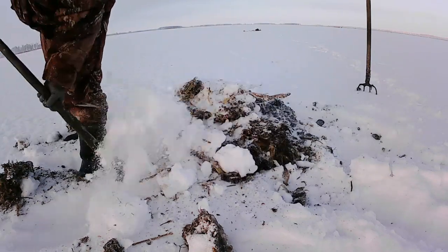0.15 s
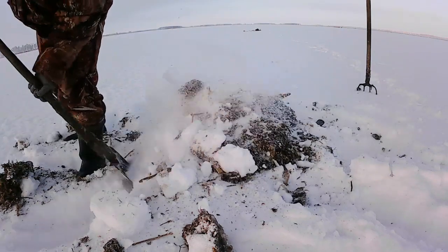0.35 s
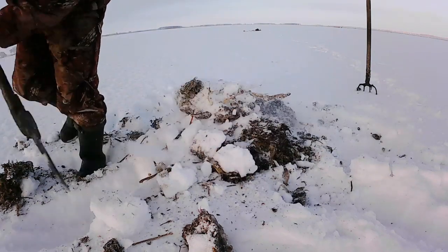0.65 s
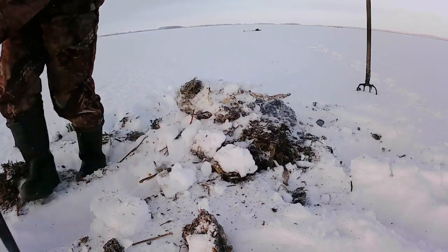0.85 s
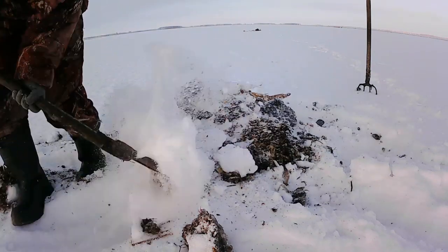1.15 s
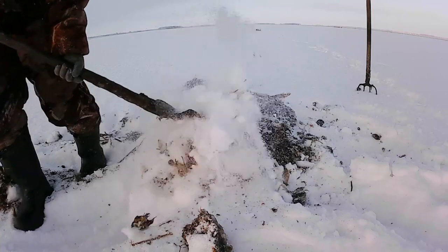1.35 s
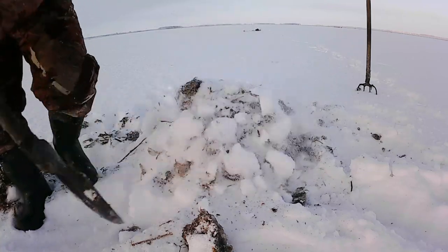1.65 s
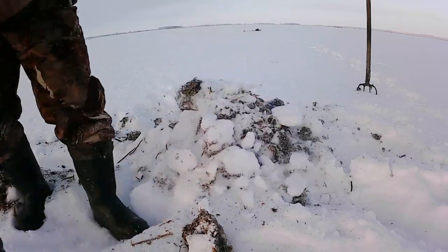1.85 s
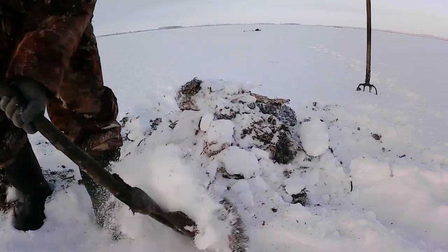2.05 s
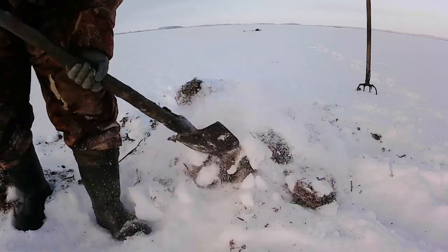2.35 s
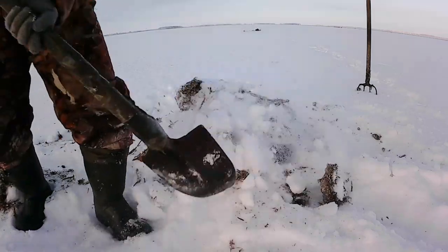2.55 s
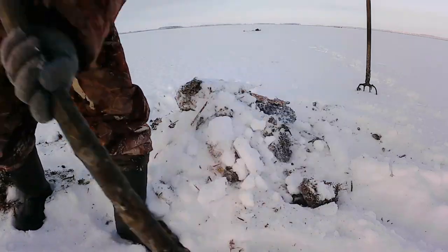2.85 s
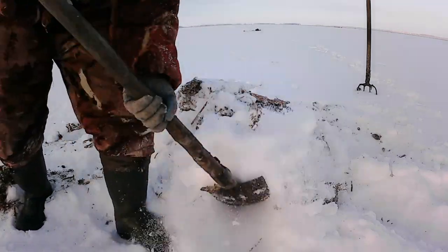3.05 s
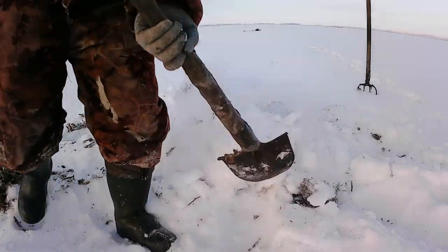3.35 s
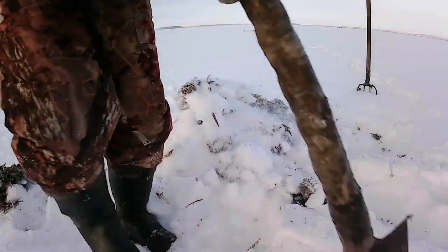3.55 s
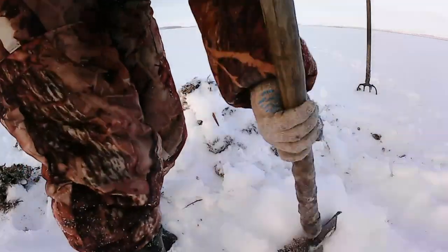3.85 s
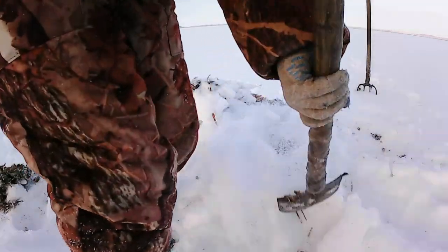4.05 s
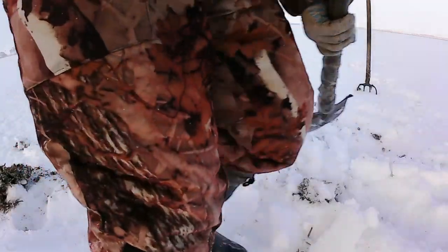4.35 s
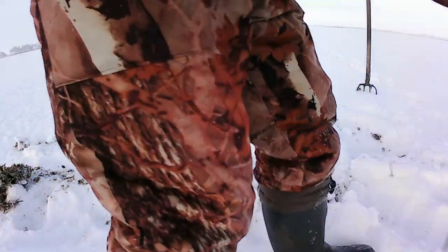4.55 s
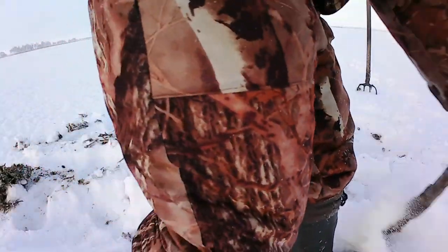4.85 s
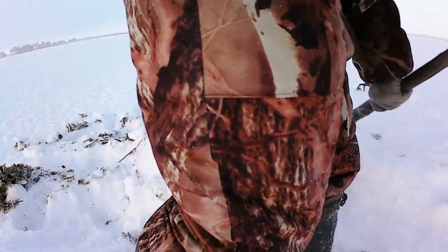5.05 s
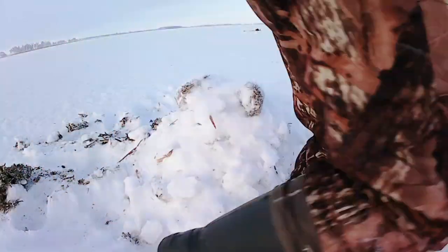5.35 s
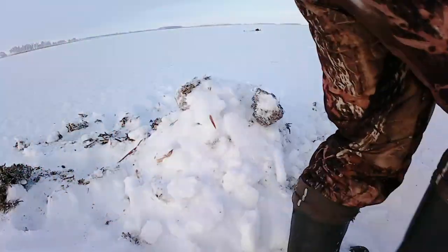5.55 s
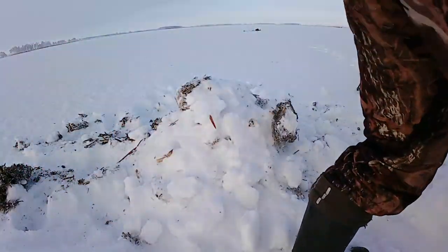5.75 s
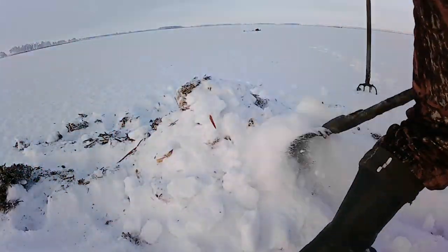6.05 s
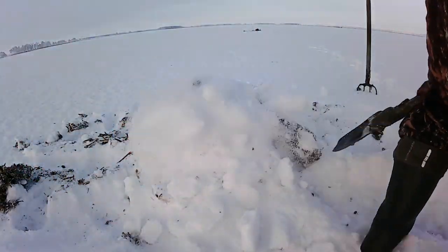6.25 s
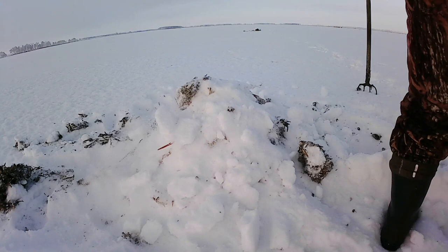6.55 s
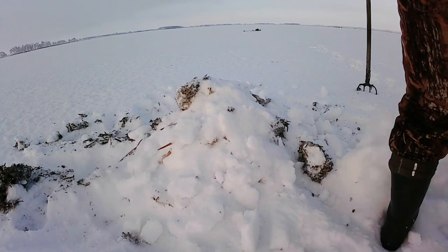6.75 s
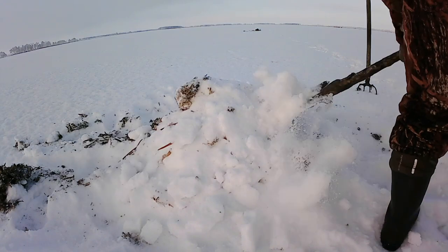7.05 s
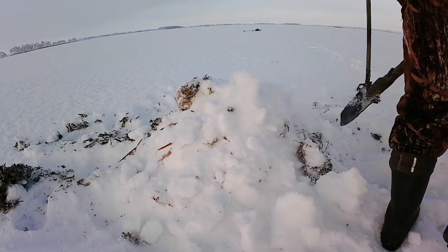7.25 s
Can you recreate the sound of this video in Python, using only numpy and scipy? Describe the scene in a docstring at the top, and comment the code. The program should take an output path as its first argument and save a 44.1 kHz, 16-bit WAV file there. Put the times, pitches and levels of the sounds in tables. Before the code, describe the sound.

A crisp crunch opens, dips almost to silence, then a spade bites and drags through packed snow. Two denser bursts of scraping and breaking crust follow, then a sharp, loud chop with a low thud. Afterwards boots squeak and crunch nearby, clothing brushes softly, and smaller throws patter and scrape. Dry, close outdoor mono sound with no echo and very faint hiss.

```python
"""Shovelling dry snow

A spade cuts, scrapes and throws dry snow onto a heap in an open field while boots tread close to a small mono microphone.
Breaking snow is a sum of countless tiny cracks, filtered into four bands: packed snow thuds, crust crunches,
grit scrapes the blade and powder hisses. Lumps give way as short bursts with a sharp snap, crumbs crack as short
pitched grains, and boots and clods thump as damped low cycles. Knocks and grit excite decaying modes of the
steel blade; trouser legs brush as cracks in one moving band, over a faint filtered-noise hiss."""
import sys
import numpy as np
from scipy import signal
from scipy.io import wavfile
from scipy.ndimage import uniform_filter1d

SR = 44100
rng = np.random.default_rng(int(sys.argv[2]) if len(sys.argv) > 2 else 0)


def unload_audio(sound):
    """Save the sound as a 16-bit wav file, at the path given as the first command line argument."""
    columns = np.transpose(np.atleast_2d(sound))
    # keep every value between -1 and 1, then stretch to whole-number steps
    steps = np.round(np.clip(columns, -1, 1) * 32767)
    wavfile.write(sys.argv[1], SR, steps.astype(np.int16))


N = 326781  # length in samples

# Cuts, scrapes, throws and steps that crush snow: start_s, rise_s, hold_s, crunch_db (once risen),
# slope_db_per_s (during the hold), then relative to the crunch: weight_db, grit_db, powder_db; last hollow_hz
STROKE_EVENTS = [(0, 0.001, 0.2, -25, -19, -10.5, -7, -13, 1380),
                 (0.2, 0.039, 0.21, -40, 26, -6, -12, -16, 1400),
                 (0.451, 0.011, 0.082, -50.5, -45.5, -7, -8, -6, 900),
                 (0.58, 0.018, 0.13, -51, -40, -19, -19, -9, 1300),
                 (0.877, 0.0044, 0.052, -48, 283, -5, -16, -1.5, 1390),
                 (0.9, 0.086, 0.049, -22, 0, -10, -7, -12.5, 1010),
                 (1.03, 0.019, 0.67, -27.5, -7, -8.5, -6.5, -15.5, 1370),
                 (1.529, 0.01, 0.28, -41.5, -16, -11, -2.5, -9, 1490),
                 (1.779, 0.011, 0.066, -32.5, -67, -4.5, -9, -9, 1250),
                 (1.855, 0.015, 0.1, -32, 26, -6, -4.5, -13.5, 1260),
                 (1.95, 0.029, 0.094, -23, -12, -10, -3.5, -7, 1280),
                 (2.07, 0.035, 0.049, -18.5, -109, -8.5, 1.5, -11, 1380),
                 (2.15, 0.026, 0.1, -22.5, -56, -17, -3, -14, 1540),
                 (2.27, 0.023, 0.21, -33.5, -36, -7.5, -1.5, -11, 1370),
                 (2.49, 0.034, 0.092, -31, -100, -10.5, -7.5, -22, 1360),
                 (2.59, 0.053, 0.27, -32, -27, -3.5, -6.5, -15.5, 1220),
                 (2.863, 0.03, 0.11, -20, -30, -15, -1, -9, 1440),
                 (2.97, 0.029, 0.13, -26, -9, -13, 0.5, -13, 1440),
                 (3.09, 0.048, 0.24, -31, -3, -11.5, -3, -15.5, 1350),
                 (3.38, 0.038, 0.23, -50, 62, -6.5, -1.5, -11, 1300),
                 (3.659, 0.034, 0.029, -22.5, -114, -15, -12, -23.5, 900),
                 (3.725, 0.014, 0.053, -14.5, -117, -10.5, -2, -7.5, 1340),
                 (3.792, 0.021, 0.13, -22, -54, -9.5, -1, -13, 1250),
                 (3.938, 0.11, 0.16, -26, -29, -6.5, -4, -19, 1120),
                 (4.223, 0.0067, 0.037, -31, 25, -5, -10, -26, 1190),
                 (4.27, 0.037, 0.037, -49.5, -57, -1, 2, -9, 1450),
                 (4.329, 0.0064, 0.013, -32.5, 100, -3.5, -12, -33, 930),
                 (4.36, 0.01, 0.056, -57, -50, -8, -7, -18, 900),
                 (4.455, 0.0057, 0.089, -47.5, -67, -13, -3, -26, 1230),
                 (4.529, 0.024, 0.22, -33.5, 3, -7, -7, -18, 1340),
                 (4.775, 0.054, 0.15, -31, -14, -13.5, 1.5, -13.5, 1460),
                 (4.99, 0.013, 0.21, -36.5, 13, -7, -7, -23, 1550),
                 (5.23, 0.0078, 0.073, -33.5, -22, -7.5, -6, -35, 1380),
                 (5.339, 0.011, 0.061, -41.5, 75, -14, -10, -16, 1090),
                 (5.504, 0.008, 0.041, -34, -438, -7, -11, -27, 1116),
                 (5.594, 0.0079, 0.099, -37.5, 93, -13, -6.5, -16, 1290),
                 (5.68, 0.05, 0.11, -30.5, -35, -6.5, -4, -23, 1430),
                 (5.81, 0.042, 0.18, -38, 1, -3.5, -6, -18, 1450),
                 (6.04, 0.0093, 0.035, -31.5, -56, -9.5, -5, -29, 1580),
                 (6.09, 0.051, 0.112, -43, -109, -24, 1, -7, 1490),
                 (6.22, 0.034, 0.14, -53.5, 15, -10, 2, 0, 1500),
                 (6.355, 0.029, 0.22, -36, -18, -6.5, -5, -11.5, 1300),
                 (6.549, 0.0056, 0.048, -31, -93, -10, -6, -9, 1600),
                 (6.599, 0.016, 0.13, -35, -26, -7.5, 1.5, -8.5, 1600),
                 (6.73, 0.05, 0.18, -35, 20, -9, -5.5, -19, 1440),
                 (6.96, 0.034, 0.21, -38.5, -5, -10.5, -3.5, -15, 1500),
                 (7.15, 0.029, 0.39, -47, 10, -32, -4, -13.5, 1590)]
# Change of each grain kind within a stroke: weight_db_per_s, crunch_db_per_s, grit_db_per_s, powder_db_per_s
SETTLING_SLOPES = (-8.5, 0, -6, -19.5)
# Loose snow trickling between strokes: weight_db, crunch_db, grit_db, powder_db
TRICKLE_LEVELS = (-57.5, -54, -58.5, -63)
# Relative colour of breaking snow as the microphone housing shapes it: frequency_hz, level_db
SNOW_COLOUR = [(18, -100), (30, -19), (244, -8), (760, -1.5), (863, 0.5), (1110, -3), (1500, 2),
               (2430, -5.5), (2690, -5), (2970, -9.5), (4030, -9), (4680, -13.5), (7190, -19), (12500, -36),
               (16300, -103), (22000, -120)]
# Grain kinds, one row each for weight, crunch, grit, powder: low_edge_hz, high_edge_hz, cracks_per_s, size_spread_db, gain_db
GRAIN_KINDS = [(106, 590, 900, 2.5, -1), (564, 1830, 3500, 2, -5.5), (2390, 5140, 4000, 0, -3),
               (4970, 31000, 16000, 2.5, -1.5)]
# Lumps that give way: start_s, level_db (before a trim for each grain kind), grit_db and ring_db (relative
# to the lump, before trims), struck_spot_hz
LUMP_EVENTS = [(0.043, -4, -6.5, -29, 1760), (0.092, -15, -11, -10, 1570), (0.13, -15.5, -6, 0.5, 1584),
               (0.173, -13.5, -11, -11, 1400), (0.431, -14.5, -9.5, -18, 830),
               (0.609, -23.5, -28, -23, 1550), (0.634, -30, -18, -11, 596), (0.903, -18, -21, -6, 1350),
               (0.943, -21, -17, -18, 1380), (0.996, -5.5, -4, -0.5, 2940), (1.026, -7.5, -30, -4.5, 930),
               (1.148, -12.5, -3.5, -4, 1740), (1.195, -11, -4.5, -26, 1400), (1.267, -19, 0.5, -3, 1680),
               (1.515, -28, -7, -15, 1620), (1.79, -19.5, -11, -15, 1240), (1.982, -2, -6, -7, 2770),
               (2.004, -10, -10, -3.5, 864), (2.029, -4.5, -1, -5, 3360), (2.099, 1, -13, -9, 3370),
               (2.122, -4, -4, -19, 2540), (2.134, -6, -1, -7, 1740), (2.182, -2.5, -5.5, -20, 1640),
               (2.211, -4, -8.5, -9.5, 1730), (2.265, -5.5, -10, -10, 3720), (2.366, -10, -19, -29, 1480),
               (2.505, -11, -34.5, -26, 1340), (2.875, -18, 4, 0, 4220), (2.894, -7, 1.5, -13, 1540),
               (2.916, 0.5, -0.5, -8, 1760), (2.987, -11, 0, -1, 920), (3.01, -7, -9, -7, 1230),
               (3.058, -13.5, -10, 4, 1550), (3.073, -6, -4, -8.5, 1570), (3.187, -11, -11, -9.5, 1570),
               (3.327, -8, -6.5, -24, 1760), (3.625, -21, -26, -12, 1205), (3.69, -22, -26, -3, 860),
               (3.739, 6.5, -8, -7, 4230), (3.744, 2.5, -23, -5.5, 1360), (3.77, 1.5, -4, -7.5, 2260),
               (3.787, -3, -3.5, -19, 2250), (3.844, 0, -8.5, -11, 2250), (3.924, -11, -24, -2, 1940),
               (4.025, -16, -25, 3.5, 1740), (4.098, -16, -25, 1.5, 870), (4.181, -5.5, -16, -5, 990),
               (4.231, -18, -22, -4, 880), (4.25, -11, -14, -9, 1440), (4.336, -16.5, -26, -19, 840),
               (4.556, -22, -3, -1, 1400), (4.807, -20.5, -2, 0, 1570), (4.867, -10.5, -0.5, -4, 1010),
               (4.925, -16.5, -3.5, 3, 1730), (4.998, -14.5, -9, -9, 1654), (5.078, -14.5, -14, -9, 1760),
               (5.2, -14.5, -18, -7.5, 1480), (5.235, -25, -10, -7, 1690), (5.391, -26, -26, -4.5, 860),
               (5.51, -31, -35, -16, 1150), (5.649, -15, -4, -20, 646), (5.797, -23.5, 2, -17, 3800),
               (6.051, -19, -1.5, -8, 3700), (6.07, -19, -4.5, -13.5, 1570), (6.266, -28.5, -7, -12, 1890),
               (6.3, -19.5, -34, -25, 1490), (6.385, -31, -4, 5, 760), (6.554, -23.5, 2.5, -3.5, 1730),
               (6.621, -20.5, 3.5, 0, 1580), (6.712, -15, -17, -11.5, 1600),
               (6.961, -37, -20.5, -18.5, 825), (7.335, -30, -2, -6, 1710)]
# A boot, a clod or the blade lands on packed snow: start_s, level_db (before the trims of packing and thud)
THUMP_EVENTS = [(0.43, -24.5), (0.943, -37), (1.149, -25), (1.515, -35), (1.79, -22.5), (1.978, -21),
                (2.21, -29), (2.369, -32), (2.505, -29), (3.328, -23.5), (3.693, -20.5), (3.744, -29),
                (3.772, -17), (4.1, -24), (4.232, -27), (4.25, -18), (4.337, -30.5), (4.554, -28),
                (5.2, -25), (5.238, -40), (5.521, -35), (5.601, -37), (5.649, -28.5), (5.75, -26),
                (6.072, -38), (6.268, -42), (6.712, -33), (6.96, -28.5), (7.334, -37)]
# Modes of the steel blade: mode_hz, level_db, t60_s
BLADE_MODES = [(591, -5, 0.13), (870, -1, 0.2), (1015, -9.5, 0.031), (1334, -1, 0.058), (1566, -0.5, 0.049),
               (1732, -2.5, 0.1), (2097, -7.5, 0.17), (2254, -2.5, 0.029), (2665, -8, 0.043),
               (2802, -9.5, 0.076), (3388, -3.5, 0.079), (3820, 1, 0.022), (4160, -5, 0.073),
               (5500, -27, 0.12)]
# Stiff trouser legs brushing together near the microphone: start_s, level_db, fade_s
BRUSH_EVENTS = [(4.768, -36.5, 0.25), (5.026, -39.5, 0.1), (5.603, -45, 0.27), (6.51, -51, 0.78)]
# Relative colour of the field and microphone hiss: frequency_hz, level_db
AIR_COLOUR = [(18, -12), (30, -9.5), (384, -7.5), (470, -5.5), (653, -16.5), (1360, -14), (2250, -66),
              (10200, -17.5), (12500, -20.5), (16300, -23), (22000, -120)]

RISE_CURVE, STOP_S = 1.14, 0.014  # exponent of the swell into a stroke; time constant of its stop
TRICKLE_HZ = 1340  # pitch of the hollow between strokes
HOLLOW_DRIFT = 0.11  # rms wander of the log pitch of the hollow
CRUMB_LOW_HZ, CRUMB_HIGH_HZ, CRUMB_CYCLES = 593, 4510, 8.1
CRUMBS_PER_S, CRUMB_DB = 9, -12  # rate for each crumb size; level relative to the crunch
LUMP_RISE_S, LUMP_S, LUMP_FADE_POWER = 0.0028, 0.0094, 1.55  # rise, fade and steepness of the fade
CREAK_S, CREAK_DB = 0.006, -17  # a lump creaks ever louder before it gives
THUMP_S, PUSH_S = 0.014, 0.0022  # fade of the packing under a thump; time to the peak of its push
BRUSH_RISE_S, AIR_DB = 0.062, -58
EDGE_HZ = 12600  # upper band limit


def strokes():
    """Energy envelopes add: each stroke swells, sags or grows evenly in dB, and decays fast at its stop."""
    power = gain_of(TRICKLE_LEVELS)[:, None] ** 2 * np.ones(N)
    weighted_pitch = power[1] * TRICKLE_HZ
    for start, rise, hold, db, db_per_s, weight_db, grit_db, powder_db, hollow_hz in STROKE_EVENTS:
        # the next stroke takes over once risen
        later = [s + r for s, r, *_ in STROKE_EVENTS if s > start]
        if later:
            hold = min(hold, later[0] - start - rise)
        t = np.arange(-rise, hold + .1, 1 / SR)  # zero where the rise ends
        swell = np.minimum(1 + t / rise, 1) ** RISE_CURVE
        stop = np.exp(-np.maximum(t - hold, 0) / STOP_S)
        shape = swell * stop * gain_of(db + db_per_s * np.clip(t, 0, hold))
        for kind, rel_db in enumerate((weight_db, 0, grit_db, powder_db)):
            settling_db = SETTLING_SLOPES[kind] * (t - hold / 2)
            add(power[kind], start, (shape * gain_of(rel_db + settling_db)) ** 2)
        add(weighted_pitch, start, shape ** 2 * hollow_hz)
    return np.sqrt(power), weighted_pitch / power[1]


def snow(levels, hollow_hz, bursts):
    """Shot noise in four bands: all grain kinds clump together as the crust slips, and a hollow resonates."""
    out = np.zeros(N)
    slips_db = 0.94 * wander(40)
    for (lo_hz, hi_hz, per_s, spread_db, db), level, burst in zip(GRAIN_KINDS, levels, bursts):
        def band_db(hz):
            edges = (1 + (lo_hz / (hz + 1)) ** 6) * (1 + (hz / hi_hz) ** 6)
            return read(SNOW_COLOUR, hz) - 10 * np.log10(edges)

        steady = level * gain_of(db + slips_db + 1.5 * wander(11.2))
        grains = cracks(per_s, spread_db) * np.sqrt(steady ** 2 + burst)
        out += signal.oaconvolve(grains, causal(band_db))[:N]
    # the hollow between blade or boot and snow lends the crunch a pitch that moves
    hz = hollow_hz * np.exp(HOLLOW_DRIFT * wander(6.5))
    hollow = evened(resonate(resonate(cracks(1500, 2.0), hz, 770), hz, 800))
    return out + hollow * levels[1] * gain_of(-5.0 + slips_db)


def crumbs(crunch):
    """Small bodies crack as short pitched grains: frozen crumbs of 16 sizes, under the level of the crunch."""
    out, t = np.zeros(N), np.arange(2000) / SR
    for hz in np.geomspace(CRUMB_LOW_HZ, CRUMB_HIGH_HZ, 16):
        turns = hz * t
        envelope = turns * np.exp(-2 * turns / CRUMB_CYCLES)
        roughness = 1 + 0.33 * rng.standard_normal(len(t))
        crumb = np.sin(2 * np.pi * turns) * envelope * roughness
        crumb /= np.linalg.norm(crumb)
        size_gain = gain_of(read(SNOW_COLOUR, hz)) * np.sqrt(hz)
        out += size_gain * signal.oaconvolve(cracks(CRUMBS_PER_S, 3.7), crumb)[:N]
    return crunch * gain_of(CRUMB_DB) * evened(out)


def lumps():
    """Brittle failure sets burst power for grain kinds and blade modes: a creak, a quick rise, a fade."""
    grains, modes = np.zeros((4, N)), np.zeros((len(BLADE_MODES), N))
    lead = .03  # seconds of creak before the lump gives
    t = np.arange(-lead, .05, 1 / SR)
    after = np.maximum(t, 0)
    creak = gain_of(CREAK_DB) * np.exp(-abs(t) / CREAK_S)
    rise = np.hypot(1 - np.exp(-after / LUMP_RISE_S), creak)
    fade = np.exp(-(after / LUMP_S) ** LUMP_FADE_POWER)
    for s, db, grit_db, ring_db, spot_hz in LUMP_EVENTS:
        power = (gain_of(db) * rise * fade) ** 2
        for kind, rel_db in enumerate((-11.0, grit_db - 6.0, grit_db - 22.0), 1):  # crunch, grit, powder
            add(grains[kind], s - lead, gain_of(rel_db) ** 2 * power)
        for k, (hz, _, _) in enumerate(BLADE_MODES):  # the struck spot favours the modes near its own pitch
            detuning_db = min(51.0 * abs(np.log2(hz / spot_hz)), 20.0)
            add(modes[k], s - lead, gain_of(ring_db - detuning_db) ** 2 * power)
    # thumps press the packed snow, the weight kind
    packing = rise * np.exp(-(after / THUMP_S) ** 2)
    for s, db in THUMP_EVENTS:
        add(grains[0], s - lead, (gain_of(db - 9.5) * packing) ** 2)
    return grains, modes


def snaps():
    """Impulsive fracture: the crust over each lump breaks with one sharp crack just after it starts to give."""
    clicks = np.zeros(N)
    for (s, db, *_), sign in zip(LUMP_EVENTS, rng.choice([-1., 1.], len(LUMP_EVENTS))):
        add(clicks, s + 0.00154, np.array([sign * gain_of(db - 2.5)]))
    return signal.oaconvolve(clicks, causal(lambda hz: read(SNOW_COLOUR, hz)))[:N]


def thuds():
    """Damped oscillation: every thump pushes the packed snow under it through one dull, low cycle or two."""
    out, t = np.zeros(N), np.arange(3000) / SR
    envelope = t / PUSH_S * np.exp(1 - t / PUSH_S)
    for (s, db), chance in zip(THUMP_EVENTS, rng.random(len(THUMP_EVENTS))):
        hz = 290 * (0.49 + 1.22 * chance)
        add(out, s, gain_of(db - 1.0) * np.sin(2 * np.pi * hz * t) * envelope)
    return out


def blade(grit, bursts):
    """Modal excitation: knocks and passing grit ring the steel, each mode struck at its own moments."""
    rub = grit * gain_of(-14.0)
    t, out = np.arange(4000) / SR, np.zeros(N)
    for (hz, db, t60), burst in zip(BLADE_MODES, bursts):
        ring = gain_of(-60 * t / t60) * np.sin(2 * np.pi * hz * t)
        ring /= np.linalg.norm(ring)
        strikes = cracks(1500, 2.1) * np.sqrt(burst + rub ** 2)
        out += gain_of(db) * signal.oaconvolve(strikes, ring)[:N]
    return out


def rustle():
    """Stick-slip friction: fibres catch and slip, and the weave colours them in one band."""
    level, hz = np.zeros(N), 2640 * np.exp(0.017 * wander(2.5))
    for s, db, fade_s in BRUSH_EVENTS:
        t = np.arange(0, 2 * fade_s, 1 / SR)
        add(level, s, gain_of(db) * np.minimum(t / BRUSH_RISE_S, 1) * np.exp(-(t / fade_s) ** 2))
    return level * evened(resonate(resonate(cracks(2500, 2.4), hz, 380), hz, 380))


def air():
    """Stationary filtered noise: a faint even hiss of field and microphone."""
    colour = causal(lambda hz: read(AIR_COLOUR, hz))
    return gain_of(AIR_DB) * signal.oaconvolve(rng.standard_normal(N), colour)[:N]


def gain_of(db):
    """Decibel law for amplitude."""
    return 10 ** (np.asarray(db) / 20)


def evened(x):
    """Normalisation to rms 1."""
    return x / np.sqrt(np.mean(x ** 2) + 1e-20)


def read(points, hz):
    """Interpolation of a spectrum on a logarithmic frequency axis."""
    f, value = np.transpose(points)
    return np.interp(np.log(hz + 1), np.log(f + 1), value)


def add(mix, s, sound):
    """Superposition: adds the sound in place from s seconds on, cut at the end of the mix."""
    part = mix[round(s * SR):][:len(sound)]
    part += sound[:len(part)]


def causal(db_at):
    """Minimum phase: the causal response with earliest energy for the colour db_at(hz), scaled to energy 1."""
    hz = abs(np.fft.fftfreq(8192, 1 / SR))
    log_gain = np.log(gain_of(np.maximum(db_at(hz), -110)))
    taps = np.fft.ifft(np.exp(np.conj(signal.hilbert(log_gain)))).real[:3000]
    return taps / np.linalg.norm(taps)


def wander(corner_hz):
    """Low-passed noise: a slow random fluctuation of rms 1."""
    noise = uniform_filter1d(rng.standard_normal(N), 40)
    return evened(signal.lfilter([1], [1, -np.exp(-2 * np.pi * corner_hz / SR)], noise))


def cracks(per_s, spread_db):
    """Shot noise of rms 1: clicks of random sign at random moments, sizes spread exponentially in dB."""
    size = gain_of(spread_db * np.minimum(rng.exponential(1, N), 5)) * rng.choice([-1., 1.], N)
    return evened(size * (rng.random(N) < per_s / SR))


def resonate(x, hz, width_hz):
    """Heterodyning: shifts the curve hz to zero, smooths, and shifts back, a moving resonance of gain 1."""
    turn = np.exp(2j * np.pi * np.cumsum(hz) / SR)
    r = np.exp(-np.pi * width_hz / SR)
    return 2 * (turn * signal.lfilter([1 - r], [1, -r], x / turn)).real


def scene():
    """Superposition of all sources, alike in two channels."""
    levels, hollow_hz = strokes()
    grain_bursts, mode_bursts = lumps()
    mix = snow(levels, hollow_hz, grain_bursts) + crumbs(levels[1]) + snaps() + thuds()
    mix += blade(levels[2], mode_bursts) + rustle() + air()
    return np.tile(mix, (2, 1))


def record(dry):
    """Transducer limits: deepest bass is lost, loudest peaks round off at full scale, then the band is limited."""
    thin = signal.lfilter(*signal.butter(2, 42, "high", fs=SR), dry)
    rounded = thin / (1 + abs(thin) ** 6) ** (1 / 6)
    band_limit = signal.firwin(511, EDGE_HZ, window=("kaiser", 9), fs=SR)
    return signal.oaconvolve(rounded, band_limit[None], "same")


dry = scene()
out = record(dry)
unload_audio(out)
```